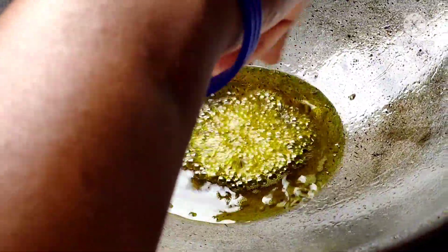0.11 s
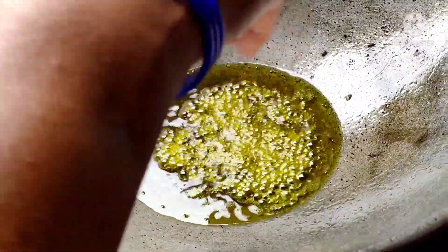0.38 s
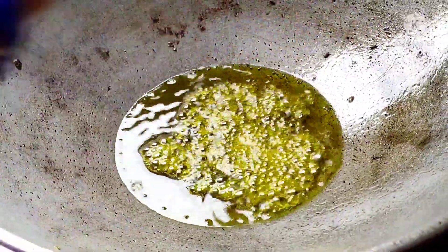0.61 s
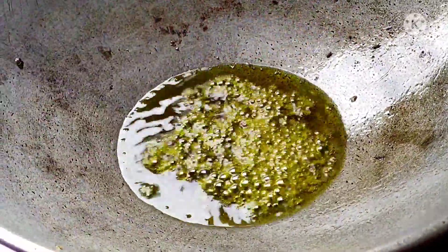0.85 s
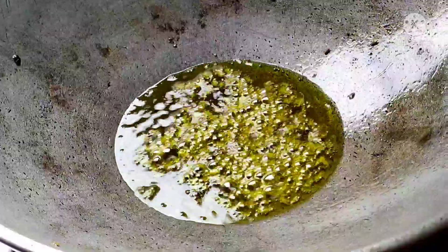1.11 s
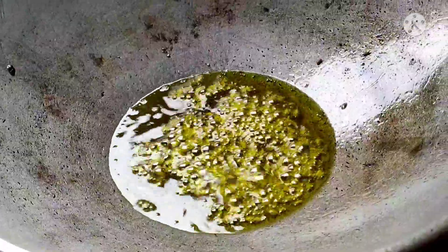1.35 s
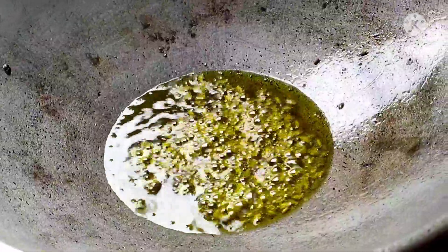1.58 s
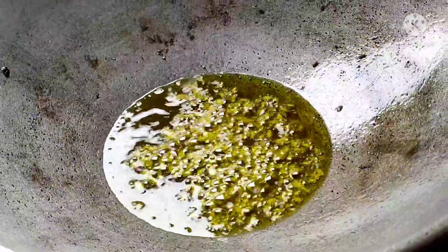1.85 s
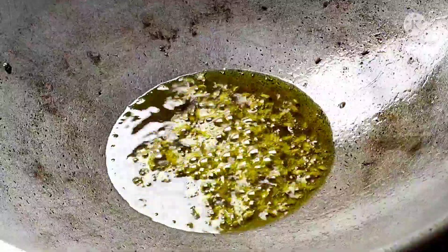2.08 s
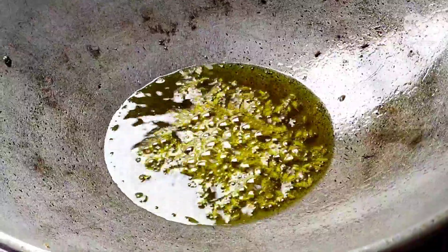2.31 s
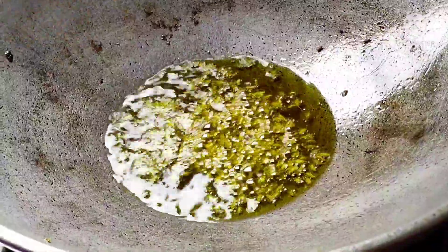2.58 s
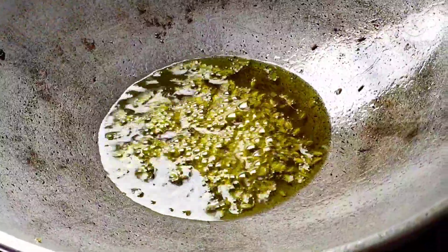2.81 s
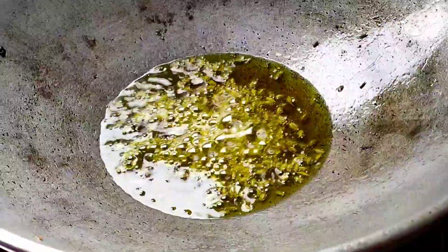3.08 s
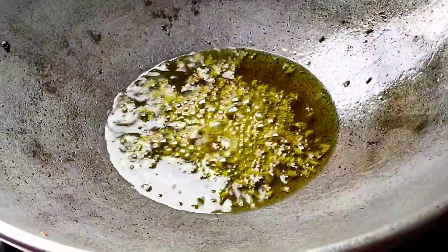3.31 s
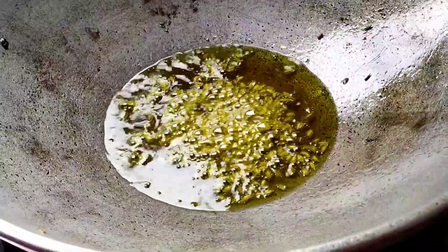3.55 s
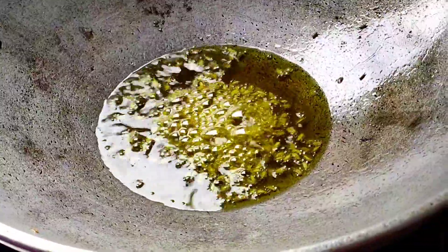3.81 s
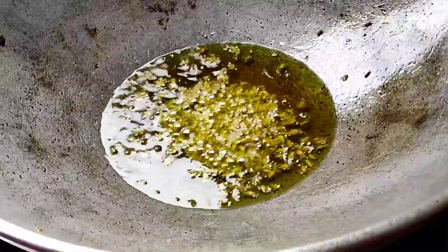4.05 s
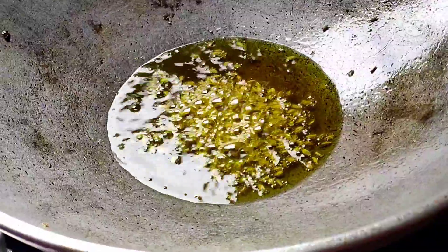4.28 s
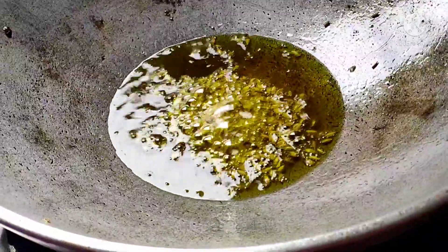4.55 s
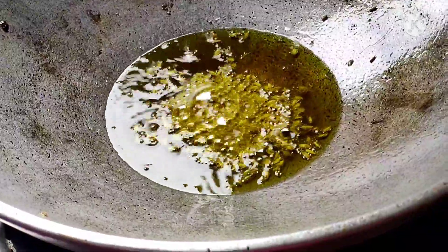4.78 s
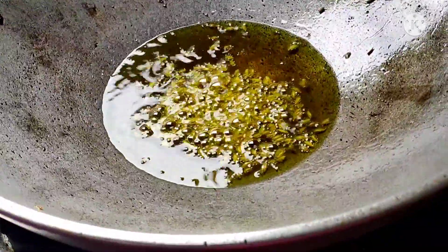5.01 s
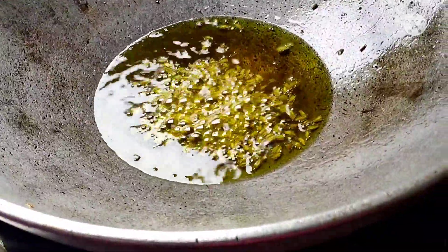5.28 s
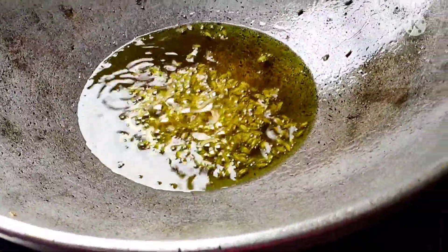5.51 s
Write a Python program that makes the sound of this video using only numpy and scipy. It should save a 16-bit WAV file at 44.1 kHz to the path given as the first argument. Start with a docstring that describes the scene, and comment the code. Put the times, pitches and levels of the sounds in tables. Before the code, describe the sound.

Seeds sizzle in hot oil in a metal pan, thin bright hiss and sharp crackling pops, with one dull thump late on.

```python
"""A low kitchen rumble and a faint knock; fizz swells as seeds fry in hot oil in a metal pan: steam bubbles as
random clicks over noise. From 0.5 s the pan clicks, thickest at 1 to 2.5 s: seeds bursting and a few strong
late echoes, as ringing clicks plus wall echoes. Knocks from 3.9 s ring worktop modes; two taps by the left
microphone, a dull thump at 4.6 s, a soft noise rustle at 5 s as the fizz surges, last knocks.
The right microphone faces the pan and peaks near 7 kHz; the left is turned away and duller."""
import sys
import numpy as np
from scipy import signal
from scipy.fft import rfft, irfft, next_fast_len
from scipy.io import wavfile
from scipy.ndimage import map_coordinates

SR = 44100
rng = np.random.default_rng(int(sys.argv[2]) if len(sys.argv) > 2 else 0)


def transcribe(u):
    """Save the signal u as a 16-bit wav file named by the first command-line argument.

    u: samples, shape (n,) or (channels, n), limited to [-1, 1]; the rate is SR.
    q: integer samples, one column per channel.
    """
    v = np.clip(np.atleast_2d(u).T, -1, 1)
    q = np.round(v * 32767).astype(np.int16)
    wavfile.write(sys.argv[1], SR, q)


def decibels_to_gain(level_db):
    """Convert a level in decibels to a linear amplitude gain (20 dB per decade)."""
    exponent = np.asarray(level_db, float) / 20
    return 10 ** exponent


N = 248679


def unit(x):
    """Scales to rms 1 in the last channel."""
    return x / np.sqrt(np.mean(np.atleast_2d(x)[-1] ** 2) + 1e-20)


def along(points, hz):
    """Reads (hz, value) points on a log frequency axis."""
    f, v = np.transpose(points)
    return np.interp(np.log(hz + 1), np.log(f + 1), v)


def level(colour, hz):
    """Gain of a colour, scaled to rms 1 over frequency."""
    return unit(decibels_to_gain(along(colour, hz)))


def curves(rows):
    """One value per sample for each column after the time."""
    s, *cols = np.transpose(rows)
    return [np.interp(np.arange(N) / SR, s, c) for c in cols]


def wobble(rate_hz):
    """A smooth random curve with rate_hz knots a second."""
    knots = rng.standard_normal(int(N * rate_hz / SR) + 4)
    return map_coordinates(knots, [np.arange(N) * rate_hz / SR])


def filtered(x, response):
    """Applies a complex response of frequency."""
    m = 2 * next_fast_len(x.shape[-1] // 2 + 4096)
    return irfft(rfft(x, m) * response(np.fft.rfftfreq(m, 1 / SR)), m)[..., :x.shape[-1]]


def causal(gain):
    """Minimum-phase response with this gain: nothing sounds before the click."""
    c = irfft(np.log(gain + 1e-5))
    c[..., 1:c.shape[-1] // 2] *= 2
    c[..., c.shape[-1] // 2 + 1:] = 0
    return np.exp(rfft(c))


def add(into, x, start_s):
    """Mixes x in from start_s on."""
    part = into[:, round(start_s * SR):][:, :x.shape[-1]]
    part += x[:, :part.shape[1]]


# left microphone, turned away, minus right: hz, gain_db
AWAY = [(1200, -4.5), (2000, -2.5), (2800, -7.5), (4000, -17), (5000, -21.5), (5700, -26.5), (6500, -42),
        (7300, -38), (8300, -18)]


def from_pan(x, gain):
    """Colours pan sound, duller at the microphone turned away."""
    return filtered(x, lambda hz: causal(gain(hz) * [decibels_to_gain(along(AWAY, hz)), np.ones(len(hz))]))


# left-right likeness of room noise: hz, correlation
ALIKE = [(30, 1), (130, 0.94), (250, 0.8), (600, 0.95), (1000, 0.63), (1500, 0.74), (3000, 0.04)]


def diffuse(gain):
    """Room noise of rms 1, alike at both microphones in the bass."""
    def response(hz):
        turn = np.arccos(np.clip(along(ALIKE, hz), -1, 1)) / 2
        return gain(hz) * [np.cos(turn), np.sin(turn)]

    mid, side = filtered(rng.standard_normal((2, N)), response)
    return unit(np.array([mid + side, mid - side]))


def fizz(colour, per_s, spread_db, share):
    """Tiny steam bubbles bursting at random, over the blur of all the smaller ones."""
    size = decibels_to_gain(spread_db * np.minimum(rng.exponential(size=N), 4))
    bursts = (rng.random(N) < per_s / SR) * size * rng.choice([-1, 1], N)
    blur = np.sqrt(1 - share) * rng.standard_normal((2, N))
    froth = np.sqrt(share) * unit(bursts) * [[.3], [1]] + blur
    return unit(from_pan(froth, lambda hz: level(colour, hz)))


# how hard the seeds fry: time_s, fine_fizz_db
FRY = [(0.0, -74), (0.17, -61), (0.4, -56), (0.66, -47.5), (0.97, -44.5), (1.22, -40.5), (1.4, -41.5),
       (1.87, -42), (2.4, -44.5), (3.3, -46), (3.7, -47), (4.46, -47.5), (4.76, -51), (5.04, -44),
       (5.17, -49), (5.64, -48.5)]
# fine fizz colour: hz, gain_db
FINE = [(3000, -40.5), (4200, -29.5), (5000, -14.5), (5600, -8), (6200, -2), (6900, 3.5), (7400, 5.5),
        (7750, -2.5), (8000, -20), (8500, -46.5), (11000, -78.5)]
# coarse fizz colour: hz, gain_db
COARSE = [(760, -36), (1300, -21.5), (2060, -7), (2230, -13), (3550, -1.5), (4050, -9.5), (5200, 1),
          (6760, -27.5), (11400, -120)]


def sizzle():
    """Fine fizz flutters as the froth moves; coarse fizz sways only with the slow motion."""
    fine_db, = curves(FRY)
    coarse_db = -61.5 + 1.15 * (fine_db + 45)
    froth = wobble(10)
    fine_gain = decibels_to_gain(fine_db + 1.2 * froth + 1.4 * wobble(70))
    fine = fine_gain * fizz(FINE, per_s=900, spread_db=3.3, share=.45)
    coarse = decibels_to_gain(coarse_db + 2.0 * froth) * fizz(COARSE, per_s=160, spread_db=3, share=0.31)
    return fine + coarse


# pan clicks, seeds bursting and a few strong late echoes in rows of their own:
# start_s, strength_db, ring_hz, ring_ms, crack_hz, and relative to the snap:
# crack_db, push_db (low push), echo_db (wall echo)
PAN_CLICKS = [(0.5092, -17.5, 7020, 1.7, 4940, -22, -17, 2), (.5904, -26.5, 7000, 0.54, 3520, 2, 0.5, -2),
              (.745, -.5, 7260, .97, 5200, -18, -32, 1), (0.7862, -16, 6800, .6, 3470, -2, -9.5, -5),
              (.913, -4, 7300, 0.39, 4760, -10, -18.5, 2), (0.9951, -12.5, 6210, 0.58, 5170, -16, -27, -7),
              (1.0175, -6.5, 6300, .52, 5140, -9, -41, -4), (1.143, -19, 6000, 1.2, 5200, -12, -24, 1),
              (1.1547, -12, 6700, .7, 5240, -6, -5, 4), (1.1584, -1, 7120, 1.1, 5430, 1.5, -13.5, -1),
              (1.179, -1, 6680, .24, 4070, -1, -10.5, 3), (1.3015, -1.5, 6920, 3.3, 3820, -19, -45, 3.5),
              (1.3412, -15, 6800, .89, 5200, -14.5, -37, 0), (1.363, -18, 6790, 1.6, 3520, 18, -15, 2.5),
              (1.3936, -17, 7450, 1.6, 3500, -3, -31, 2), (1.406, -9, 7200, 0.47, 4640, 10, -21, 4.5),
              (1.4143, -16, 6140, .84, 4920, -2, -22, 0), (1.4723, -5, 7160, 1.7, 5170, -21, -38, -3),
              (1.4977, -6.5, 7000, 1.4, 5070, -0.5, -21, 8), (1.5067, -24, 7130, 1.6, 4910, 2, -26, 0),
              (1.51, -14.5, 6900, 1.4, 3630, 21, -29, 0.5), (1.5143, -6, 7130, 1.1, 3680, -1.5, -33, -1),
              (1.541, 2, 7000, 0.73, 5160, -3.5, -18.5, 2.5), (1.5515, -2, 7400, 0.78, 5170, -14.5, -31, 1),
              (1.561, -5, 6330, 0.84, 3720, -4, -25, -2), (1.64, -15.5, 7000, 1.4, 3740, 5, -28, 2),
              (1.7297, -30, 7220, 0.51, 3300, 15, -8, 1), (1.745, 3.5, 6400, 0.55, 5370, -1, -14.5, -1),
              (1.767, -0.6, 6850, 0.36, 5270, -2, -24, -1), (1.8503, -5, 7140, 1.7, 5500, -8, -32, 3),
              (1.8524, 1, 6730, 0.74, 3800, 0.5, -12, 3), (1.8545, -9, 6900, 1.2, 3900, 7, -24.5, 3),
              (1.8942, 8, 7005, 0.57, 5350, -7.5, -20, -2.5), (2.0132, -5, 6400, .25, 3400, -7, -12, 3),
              (2.0839, 3, 6540, 0.46, 5270, -5, -26.5, -6), (2.1493, -18.5, 7350, 1.7, 3660, 7, -3.5, -0.5),
              (2.2054, -7.5, 7250, 0.54, 5100, -12, -23, -2), (2.211, -14.5, 7400, 1.9, 5060, -9, -7.5, -2),
              (2.2222, -13.5, 7040, 1.1, 5200, -1, -30, -1), (2.3063, 6, 6740, 0.46, 4950, -6.5, -18, -3),
              (2.4214, -8.5, 6950, 1.4, 5190, -12, -48, -2), (2.4683, -4, 6320, .69, 3620, 8.5, -12, 1.5),
              (2.54, -9, 7100, 0.8, 4940, -3, -28, -2), (2.605, -29, 6460, .8, 5100, 5, -18, -2),
              (2.7597, -10, 7260, 0.45, 5110, -11, -10.5, 0), (2.8192, -19, 7110, 1.2, 5120, -8, -21, 0),
              (3.042, -16.5, 7930, 1.4, 5300, -15, -34, 0), (3.055, -3, 7440, 0.9, 5100, -41, -52, 0),
              (3.2181, -4, 6800, 0.59, 3880, 9, -18.5, 5), (3.3815, -8, 7600, .51, 5000, -7.5, -13.5, -5),
              (3.4642, -6, 7050, 1.2, 5500, -8, -14, 1), (3.4658, -2, 6830, 0.4, 5100, 0, -13, 4),
              (3.66, -3.5, 7300, 0.37, 4770, 4, -11.5, -4), (3.7118, -6, 7250, .7, 3500, 1, -13.5, -2),
              (3.7366, -12.5, 7240, .6, 4730, 7, -19, 0), (3.9019, 1.5, 7240, 0.52, 4960, -11, -14.5, -2),
              (4.2338, -18.5, 7040, .89, 5000, 2, -18, -2), (4.263, -17, 7390, .6, 5170, -23, -23, 0),
              (4.4976, -6.5, 7100, 0.21, 4970, -8, -49, -1), (4.5498, -3.5, 6900, 0.57, 5400, -8, -47, 3),
              (4.8261, -9, 7100, 0.39, 5400, -3.5, -31, 4.5),
              (5.1145, -4.5, 6730, 0.46, 5400, -6.5, -58, -2),
              (5.3209, -3, 7200, 0.67, 5160, -19, -22.5, -5), (5.349, -23, 6910, 0.54, 4030, 4, -4.5, -6)]
# first wall echoes of a click: delay_ms, level_db
WALLS = [(9.7, -14), (12.2, -13), (14, -21.5), (23.5, -26), (31, -23)]
# snap colour: hz, gain_db
SNAP = [(3000, -35.5), (4500, -19.5), (5400, -7), (6100, -4.5), (6700, -5), (7200, -3), (7600, -4),
        (8600, -39.5), (11000, -61)]
# low push colour: hz, gain_db
PUSH = [(200, -42), (450, 9.5), (1000, -1), (1800, -2.5), (2600, 1), (3400, 4), (4500, -11), (6000, -16.5)]


def pan_clicks():
    """Bursting seeds and a few strong late echoes: ringing clicks, returned by the walls, then the whole room."""
    out, t = np.zeros((2, N)), np.arange(SR * 2 // 5) / SR
    spit_t60_s, corner_t60_s, room_t60_s = 0.014, 0.23, 0.41
    uneven_db, lumpy_db, treble_db = 3.5, 4, -26
    rise = 1 - np.exp(-(t / 0.0046) ** 4)  # walls are metres off: the tail starts late
    # the near corner empties faster than the room
    fade = rise * (decibels_to_gain(-42.5 - 60 * t / corner_t60_s) + decibels_to_gain(-37.5 - 60 * t / room_t60_s))
    knots_hz = np.arange(0, 9000, 260)
    for start_s, db, ring_hz, ring_ms, crack_hz, crack_db, push_db, echo_db in PAN_CLICKS:
        room_db = -3 - 0.17 * db  # weak clicks come more by the walls
        spit_db = -23 + 0.12 * crack_db  # less crack, less spit
        burst = decibels_to_gain(spit_db - 60 * t / spit_t60_s) * rng.standard_normal((2, len(t)))
        burst[:, 0] = 1  # the click itself

        lumps_db = lumpy_db * np.interp(t * 500, np.arange(201), rng.standard_normal(201))
        lumps = unit(decibels_to_gain(lumps_db))
        back = decibels_to_gain(room_db) * fade * lumps * [[1.4], [1]] * rng.standard_normal((2, len(t)))
        for delay_ms, wall_db in WALLS:
            echo_gain = decibels_to_gain(room_db + wall_db + echo_db) * decibels_to_gain(rng.normal(0, 1.2))
            add(back, echo_gain * burst[:, :900] * [[1.6], [1]], delay_ms / 1000)

        sharp = 5 * (3500 / crack_hz) ** 1.8  # low cracks ring more clearly
        bumps_db = uneven_db * rng.standard_normal(len(knots_hz))
        bumps_db -= bumps_db.mean()

        def crack(hz):  # sprays upwards
            tilt = np.where(hz > crack_hz, .95, 2)
            return 1 / (1 + (sharp * np.log((hz + 1) / crack_hz)) ** 2) ** tilt

        def ring(hz, skirt):
            peak = (1 + ((hz - ring_hz) * ring_ms / 540) ** 2) ** -1.5
            return unit(decibels_to_gain(along(SNAP, hz)) * (skirt + peak))

        def rest(hz, more_db):
            return decibels_to_gain(crack_db + more_db) * crack(hz) + decibels_to_gain(push_db) * level(PUSH, hz)

        def straight(hz):
            bumps = decibels_to_gain(np.interp(hz, knots_hz, bumps_db))
            treble = decibels_to_gain(treble_db) * (hz > 8400)  # flat faint click, in the direct sound only
            # the longer the ring, the stronger the crack at its front
            return ring(hz, 0.034) + treble + decibels_to_gain(-5.5) * bumps * rest(hz, 3 * ring_ms)

        def returned(hz):
            return (ring(hz, 0.28) + rest(hz, 2.5)) / (1 + (hz / 8300) ** 30)

        add(out, decibels_to_gain(db) * from_pan(burst[:, :2000] * [[.5], [1]], straight), start_s)
        add(out, decibels_to_gain(db) * from_pan(back, returned), start_s)
    return out


# knocks: start_s, level_db, centre_hz (struck colour), breadth_octaves, left_minus_right_db
KNOCKS = [(.103, -40.5, 162, 0.7, -7.5), (3.851, -36, 370, 0.49, -4), (3.969, -41.5, 137, 1.2, 2),
          (4.5916, -24.5, 238, 1.357, -2.5), (5.021, -39.5, 396, 0.24, -6), (5.327, -35, 407, 0.09, -9),
          (5.372, -23, 400, 0.12, -3), (5.405, -34.5, 111, 0.47, -3), (5.461, -35, 126, 0.38, 1.5)]
# modes of worktop and room: mode_hz, level_db, t60_s
WORKTOP = [(73.6, -12, 0.6), (102.4, -6.5, 0.93), (138.6, -9.5, 1), (162, -20, 0.8), (189, -9, 0.96),
           (241, -18, 0.2), (327, -13, 0.5), (370, -12.5, 0.18), (407.7, -9, 0.51), (477, -20, 0.29),
           (533, -15, 0.34), (648, -13, 0.51), (718, -14, 0.51), (860, -4.5, 0.16), (945, -8, 0.3),
           (1061, -7, 0.33), (1153, -7.5, .22)]
# clatter colour: hz, gain_db
CLATTER = [(800, -7.5), (1200, -25), (1600, -16.5), (3300, -6), (4500, -12.5), (6000, -1.5), (9000, -28.5)]


def knocks():
    """Soft blows: an inward push rattles briefly and rings the worktop modes near its colour."""
    out, t = np.zeros((2, N)), np.arange(SR) / SR
    for start_s, db, centre_hz, octaves, pan_db in KNOCKS:
        clatter_db = -57.5 + 22 * octaves  # harder blows are broader and clatter more
        linger_db = 8 * (octaves - 1.23)  # narrow blows die at once, broad ones leave the modes ringing
        rattle_db = 3.5 + 9 * octaves  # narrow blows ring cleanly, broad ones rattle
        attack_s = .0035 / octaves ** 0.25  # narrow, padded blows swell slower

        def near(hz):
            return decibels_to_gain(-6 * (np.log2((hz + 1) / centre_hz) / octaves) ** 2)

        ring = np.zeros(len(t))
        for mode_hz, level_db, t60_s in WORKTOP:
            fade = decibels_to_gain(linger_db - 60 * t / t60_s) + decibels_to_gain(11.0 - 60 * t / 0.05)
            drift_rad = 0.034 * np.cumsum(rng.standard_normal(SR))  # uneven wood blurs each mode
            tone = np.sin(-2 * np.pi * mode_hz * t + drift_rad)
            ring += near(mode_hz) * decibels_to_gain(level_db) * fade * tone

        noise = rng.standard_normal(SR) + 1.66 * rng.standard_normal((2, SR))
        rattle = noise * (decibels_to_gain(-60 * t / 0.028) + decibels_to_gain(-12.5 - 60 * t / 0.32))
        thud = filtered(rattle, lambda hz: causal(near(hz) + decibels_to_gain(clatter_db) * level(CLATTER, hz)))
        swell = 1 - np.exp(-(t / attack_s) ** 2)
        gain = decibels_to_gain(db + np.array([[pan_db], [-pan_db]]) / 2)
        add(out, gain * swell * (ring + decibels_to_gain(rattle_db) * thud), start_s)
    return out


# fingers shifting beside the left microphone: centre_s, level_db, length_ms
TAPS = [(4.46, -30, 0.74), (4.535, -21.5, 0.31)]


def taps():
    """A single inward push with a slow rebound, almost all on the left."""
    out, t = np.zeros((2, N)), np.arange(-200, 1200) / SR
    for centre_s, db, length_ms in TAPS:
        push = -np.exp(0.7 - np.hypot(t * 1000 / length_ms, 0.7))
        rebound = 0.21 * np.exp(-((t - .006) / 0.013) ** 2)
        add(out, decibels_to_gain(db) * (push + rebound) * [[1], [.05]], centre_s + t[0])
    return out


# soft rustle away from the pan, one row: centre_s, half_length_s, level_db
RUSTLE = (5.05, 0.049, -55)
# rustle colour: hz, gain_db
RUSTLING = [(800, 3), (1500, 1), (2200, 3), (4500, -8), (6500, -23), (9000, -38)]


def rustle():
    """A short soft swell of dull diffuse noise."""
    centre_s, half_s, db = RUSTLE
    swell = np.exp(-((np.arange(N) / SR - centre_s) / half_s) ** 2)
    return decibels_to_gain(db) * swell * diffuse(lambda hz: decibels_to_gain(along(RUSTLING, hz)))


# rumble colour: hz, gain_db
BODY = [(31, -32.5), (52, 0), (66, -2), (80, -8), (93, -13.5), (130, -3.5), (150, -6.5), (162, -17.5),
        (176, -10), (194, -6.5), (217, -13.5), (329, -6.5), (356, -11.5), (710, -9.5), (1080, -18),
        (1300, -32), (2400, -41.5), (3120, -55), (5280, -120)]
# standing waves of the kitchen: centre_hz, width_hz, level_db
STANDING = [(69.1, 9.4, 9), (109.8, 18.6, 11.5), (141.7, 20, 3), (189.5, 4.7, 12.5), (326, 115, 1),
            (404, 24, -4)]
# left minus right of the rumble: hz, gain_db
LEAN = [(60, 3), (150, 0), (300, -1), (600, 0.5), (1200, -2.5)]
# deep drift colour: hz, gain_db
DEEP = [(3, -30), (6, -2), (22, 2), (32, -3), (40, -14), (50, -21), (70, -40)]
# microphone hiss colour: hz, gain_db
HISS = [(800, -40), (1100, 3), (1400, 5), (1900, 8), (3000, -4), (4000, -15), (5000, -22), (6200, -17),
        (7500, -7), (9000, -28.5)]


def kitchen():
    """A deep drift, a swaying rumble coloured by standing waves, and faint microphone hiss."""
    def waves(hz):
        return 1 + sum(decibels_to_gain(db) / (1 + (2 * (hz - c) / w) ** 2) for c, w, db in STANDING)

    body = diffuse(lambda hz: decibels_to_gain(along(BODY, hz)) * waves(hz))
    body = filtered(body, lambda hz: decibels_to_gain(along(LEAN, hz) * [[.5], [-.5]]))
    body_db = [[-50], [-49.5]] + 1 * wobble(5.99)  # left, right
    deep = diffuse(lambda hz: decibels_to_gain(along(DEEP, hz)))
    hiss = unit(filtered(rng.standard_normal((2, N)), lambda hz: decibels_to_gain(along(HISS, hz))))
    return decibels_to_gain(-51.5) * deep + decibels_to_gain(body_db) * body + decibels_to_gain([[-70], [-76]]) * hiss


def scene():
    """Sums the pan, the blows, the rustle and the room."""
    return sizzle() + pan_clicks() + knocks() + taps() + rustle() + kitchen()


def band_limit(x):
    """A steep low-pass at the top of the band."""
    return signal.sosfilt(signal.butter(12, 14960, fs=SR, output="sos"), x)


# arrival delay, left then right: delay_s
EDGE_DELAY_S = [
    [.00073],
    [.0005],
]
# band edge, left then right: edge_hz
TOP_HZ = [
    [7420],
    [8070],
]


def record(dry):
    """A steep band edge smears each click both ways in time; the left hears all a little later."""
    def edge(hz):
        gain = 1 / np.sqrt(1 + (hz / TOP_HZ) ** 80) + decibels_to_gain(-30)
        return gain * np.exp(-2j * np.pi * hz * EDGE_DELAY_S)

    electronics = decibels_to_gain(-88.5) * rng.standard_normal((2, N))  # broad, also past the band edge
    mix = filtered(dry, edge) + electronics
    return band_limit(mix)


dry = scene()
out = record(dry)
transcribe(out)
```